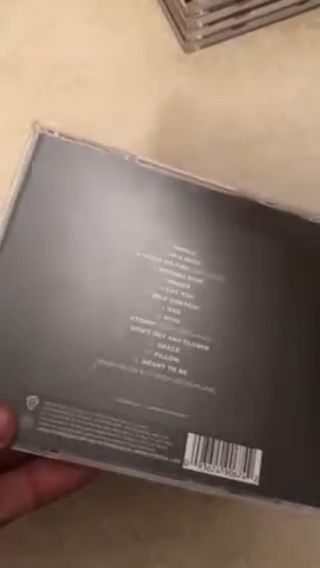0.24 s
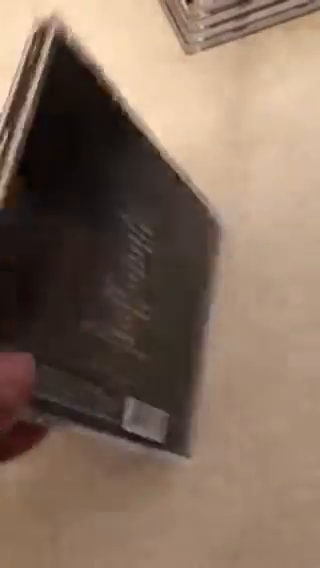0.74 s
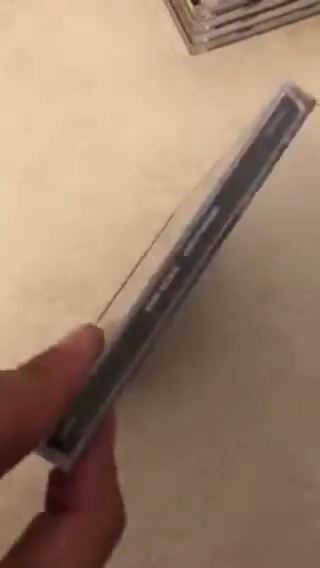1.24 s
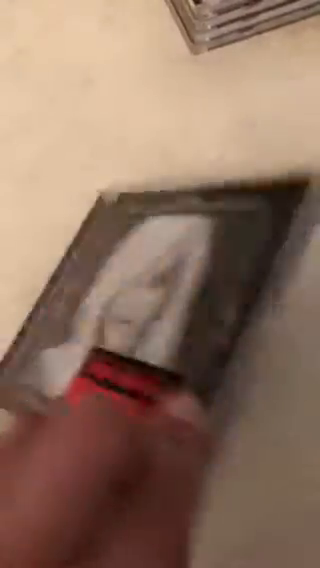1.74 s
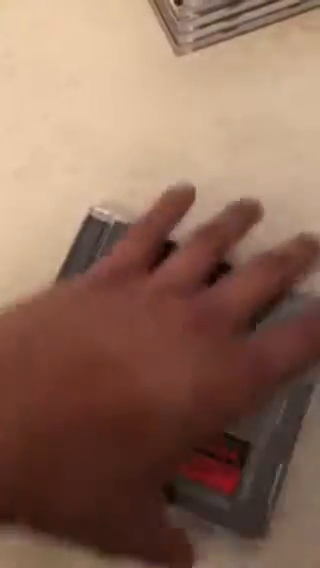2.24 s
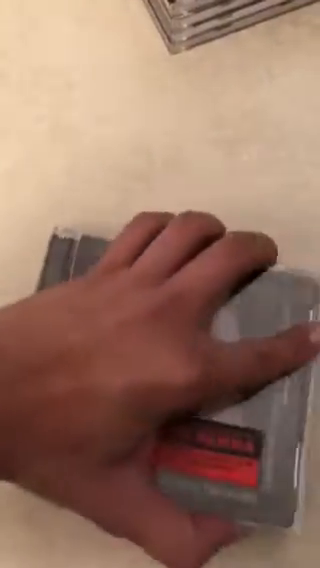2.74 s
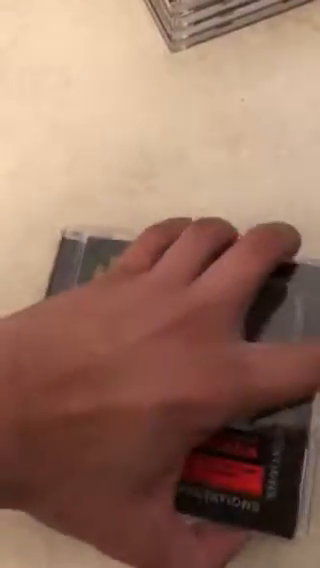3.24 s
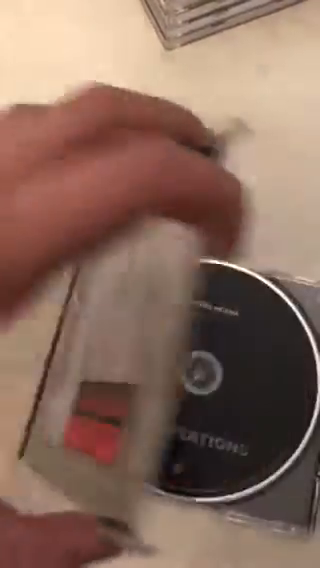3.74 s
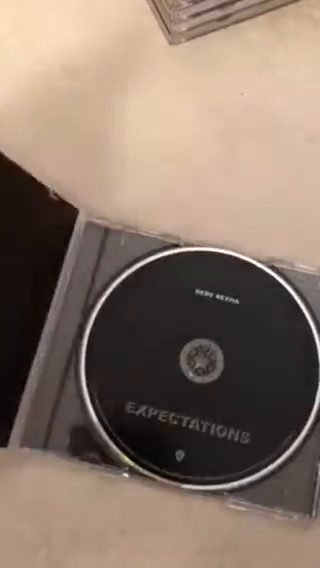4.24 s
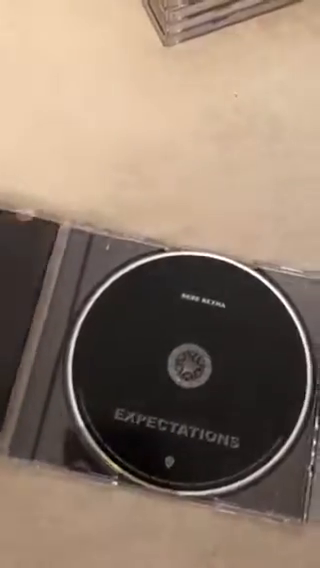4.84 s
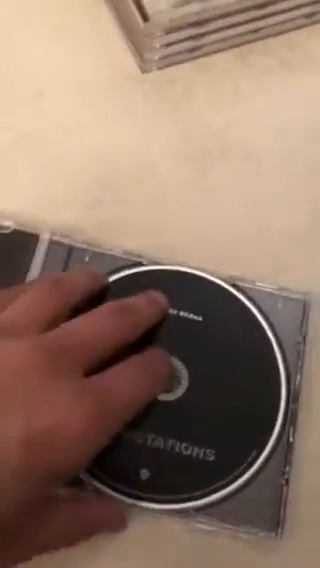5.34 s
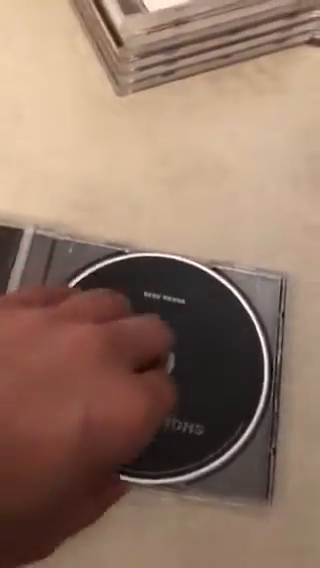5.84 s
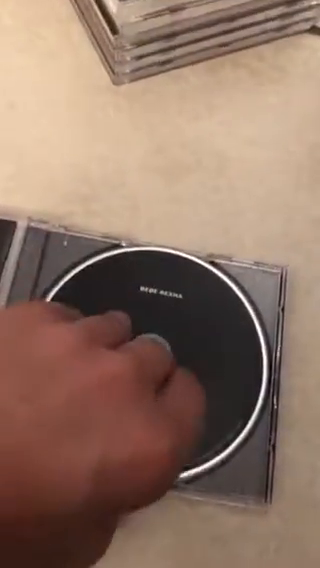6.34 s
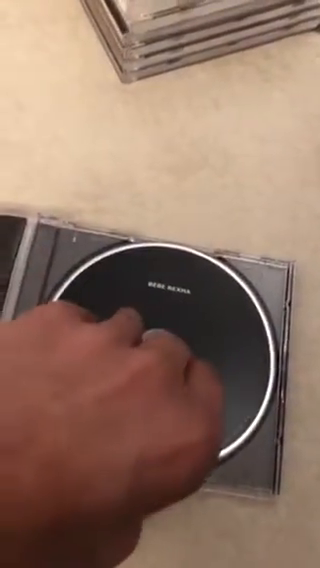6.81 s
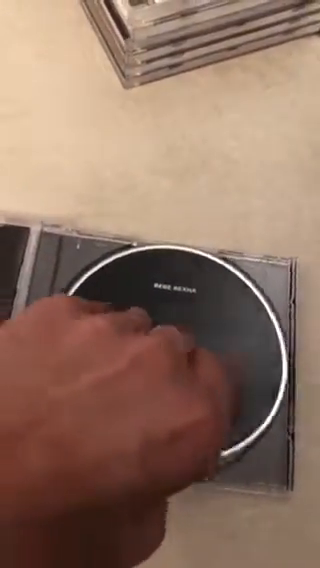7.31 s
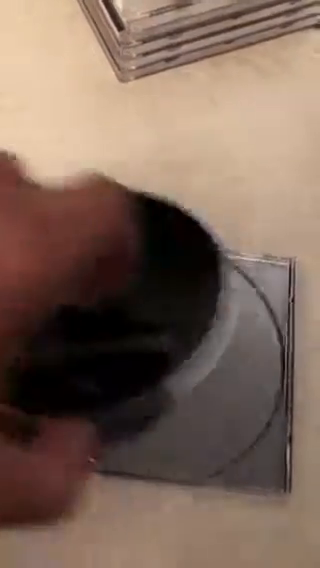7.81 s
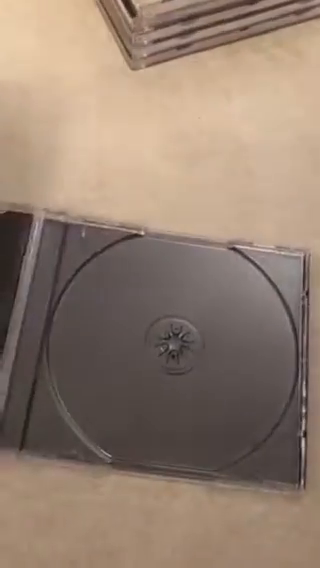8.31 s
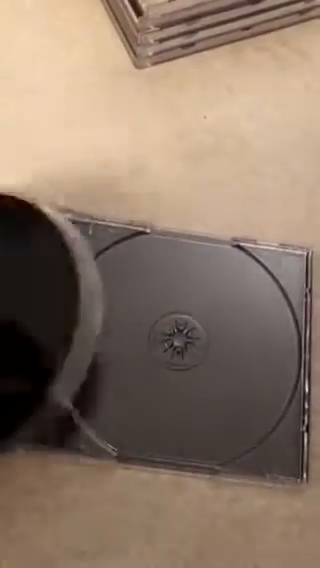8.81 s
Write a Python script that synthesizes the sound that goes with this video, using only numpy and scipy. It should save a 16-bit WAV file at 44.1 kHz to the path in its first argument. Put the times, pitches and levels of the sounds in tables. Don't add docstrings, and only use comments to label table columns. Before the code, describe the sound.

Close phone pickup of hands and a hollow plastic case on a counter: quiet ticks first, then taps and a loud rattling clack, a brief low creak, more hard clicks and skin rubbing as it opens, and a crisp double tick. Gentle sliding follows, then two very sharp snaps and a short rattle as the disc releases. Short room reflections, constant distant hum, faint traffic swell midway.

```python
import sys
import numpy as np
from scipy import signal
from scipy.fft import rfft, irfft
from scipy.io import wavfile
from scipy.ndimage import uniform_filter1d

SR = 44100
rng = np.random.default_rng(int(sys.argv[2]) if len(sys.argv) > 2 else 0)


def volts(x):
    e = np.asarray(x, float) / 20
    return 10 ** e


def to_wav(sig):
    pcm = np.clip(np.atleast_2d(sig), -1, 1) * 32767
    pcm = np.round(pcm).astype(np.int16)
    wavfile.write(sys.argv[1], SR, pcm.T)


N = 399987

# loudest_s, rising_s, fading_s, level_db, upper_band_minus_level_db
TRAFFIC = [
    (4.4, 1.4, 0.97, -62, -5),
]
# pitch_hz, density_db (per Hz)
AIR_SPECTRUM = [(24, -58), (45, -33.5), (62, -25.5), (95, -28), (200, -23.5), (310, -28.5), (400, -20.5),
                (600, -21), (720, -31), (2300, -34.5), (3000, -41), (5000, -50.5), (9000, -59),
                (13000, -67), (16000, -63)]
# pitch_hz, width_hz, lift_db
ROOM_BOOMS = [(110.3, 29.7, 14.5), (160.7, 21, 12), (242, 78, 11), (912, 200, 5.5), (1670, 92, 4),
              (2121, 304, 0.5)]
# time_s, turning_hz
SHAFT = [(0, 59.06), (1.5, 58.68), (3.5, 58.2), (5.5, 58.54), (7.5, 58.6), (9.07, 59.6)]
# multiple, level_db (rms)
SHAFT_ORDERS = [(1, -65.5), (2, -52.5), (3, -69.5), (4, -54), (5, -102), (6, -61)]
# pitch_hz, level_db (rms), wander_hz
TONES = [(41.5, -78, 0.18), (120.1, -60.5, 0.032), (210.9, -60, .8), (359.2, -55.5, 0.038),
         (383.6, -74, .4), (395.4, -61, 0.92)]
# centre_hz, t60_s
ROOM_T60 = [(1200, .22), (3500, 0.19), (10000, 0.17)]
# fastest_s, speeding_up_s, slowing_down_s, level_db, sheen_minus_level_db
RUBS = [(1.742, 0.045, 0.077, -59, -18), (2.1, 0.11, 0.07, -60, -16), (2.482, 0.042, 0.058, -57.5, -11),
        (2.99, .06, 0.082, -63, -16), (3.15, .08, 0.098, -57.5, -14), (3.508, .1, 0.13, -66, -19),
        (4.38, .04, .08, -80, 2), (4.54, .03, 0.063, -72, -12), (4.81, .12, .08, -74.5, 4),
        (4.92, .06, 0.044, -76, 2), (5.44, 0.061, 0.16, -58.5, -15), (5.61, 0.091, .06, -61.5, -19),
        (5.71, .04, .06, -69, -3), (5.9, 0.11, .06, -73, -9), (6.085, 0.041, 0.02, -62, -5.5),
        (6.308, 0.022, .025, -71, -4.5)]
# fastest_s, speeding_up_s, slowing_down_s, squeak_db, groan_minus_squeak_db
CREAKS = [
    (2.49, 0.028, 0.021, -62, 14),
    (3.53, 0.097, .12, -72, -7.5),
    (3.677, .02, .03, -71, 0),
]
# pitch_hz, width_hz, level_db
SQUEAK = [(4300, 260, -3.5), (5040, 200, 2), (6250, 286, -2.5), (7350, 400, -5.5)]
# pitch_hz, level_db, t60_s
SHELL = [(417.4, -13, 0.011), (588, -18.5, 0.018), (796, -11, 0.0135), (1128, -4, 0.033),
         (1220, 3.5, 0.016), (1425, 13, 0.0073), (1720, 4.5, 0.018), (1880, -0.5, 0.016)]
# pitch_hz, level_db, t60_s
WALLS = [(2086, -3, 0.011), (2560, 1, 0.0088), (3110, 2, .008), (3483, 0, 0.01), (3733, 4, 0.006485),
         (4300, 3.5, 0.0055), (4820, 4.5, 0.0052), (5300, 5, 0.0035), (5723, -1, 0.0086), (6670, 2, 0.0031)]
# pitch_hz, level_db, t60_s
EDGES = [(7570, 5, 0.001336), (8910, -7.5, 0.001543), (9340, -2.5, 0.00169), (11610, -3.5, 0.00242),
         (12950, -2, 0.0018), (14330, -5, 0.0019), (15500, -5, .002)]
# pitch_hz, level_db, t60_s
DISC = [(550, -6.5, .012), (798.1, -6, 0.013), (1118, -2, 0.019), (1380, -2.5, 0.01), (1596, 2, 0.022),
        (1890, -5, 0.011)]
# pitch_hz, level_db, t60_s
PETALS = [(1950, -4.5, 0.0096), (2450, -8.5, 0.0064), (2900, -1, .009), (3250, -1, .01), (3800, 1, .009),
          (4510, -4.5, 0.0055), (5400, 3, .009), (5960, 3.5, .007), (6700, -6.5, .004)]
# start_s, ring_db (walls, rms over 5 ms), boom_minus_ring_db, chatter_s
TAPS = [(1.706, -53, 6, 0.0075), (1.716, -56.5, 18.5, .0068), (1.729, -51.5, 13.5, 0.01),
        (1.744, -44.5, 8, 0.0079), (1.759, -52.5, 10.5, 0.006), (1.776, -59.5, 1, .006),
        (1.817, -60, 10, .0048), (1.845, -58, 12, .0046), (1.984, -62, 9, 0.0045),
        (2.064, -58, 13.5, 0.0076), (2.412, -60.5, 11.5, .0035), (2.47, -60, 3, .008),
        (2.8624, -62, 8, .006), (2.9485, -52.5, 5.5, 0.0062), (3.131, -56, 9, 0.016),
        (3.226, -52, 9, 0.012), (5.3767, -65, 11, .005), (5.3963, -62, 10, .0075), (5.439, -58, 10, 0.012),
        (5.5027, -62.5, 11.5, .0052), (5.5695, -67, 15.5, .012), (7.5224, -63.5, 10, .006)]
# start_s, ring_db, boom_minus_ring_db, loudest_hz, chatter_s
RATTLES = [
    (2.1404, -19, -5, 2900, .0146),
    (2.81, -44.5, 7.5, 1466, .007),
    (7.266, -38.5, -6.5, 3630, .0035),
    (7.2706, -30.5, -14.5, 3100, 0.011),
    (7.281, -36, -12, 4300, .016),
    (7.297, -43.5, -7.5, 5300, .018),
]
# start_s, ring_db, crack_minus_ring_db, loudest_hz, chatter_s
KNOCKS = [(0.7098, -42.5, -18, 1460, .0082), (1.03, -45, -11, 1425, .0102),
          (1.9265, -44, -18, 4250, 0.0038), (2.129, -25.5, -15, 1440, 0.0071),
          (2.159, -36, -7, 1560, 0.0097), (2.8219, -21.5, -12.5, 1285, 0.0039),
          (2.8338, -35, -13, 1460, .0051), (2.8482, -37.5, -17, 1320, 0.0042),
          (2.879, -40.5, -15, 1460, .0048), (3.155, -40.5, -12.5, 4100, 0.0063),
          (3.2361, -39, -8, 1300, .0083), (3.2431, -31, -13, 3500, 0.0047),
          (4.97, -36.5, -0.5, 2470, 0.0036), (4.9735, -34, -4.5, 1830, 0.0066)]
# start_s, ring_db, crack_minus_ring_db, loudest_hz, chatter_s
TEETH = [(1.9424, -57.5, -20, 3270, 0.0054), (1.628, -64, -16, 5350, .004), (3.254, -45, -19, 3280, .0089),
         (3.672, -61.5, -22, 4300, .0045), (5.686, -66, -3, 4300, .0091), (5.7244, -68, -7, 4300, .0084),
         (5.7934, -66, -.6, 4300, .0013), (6.7398, -47, -2.2, 4970, 0.0022),
         (6.853, -45.5, -2.5, 4900, 0.0024), (6.9894, -71, 0, 5300, .0051), (7.01, -64, -16, 3300, .0097),
         (7.0254, -71.5, -6.5, 5300, .001), (7.1061, -20.5, -14, 3250, .00244),
         (7.1234, -52, -11, 3790, .0076), (7.2318, -57.5, -9.5, 3532, .0062),
         (7.243, -65, -6.5, 5300, .004), (7.2536, -16, -6.5, 4700, 0.0022), (7.574, -68, 2, 7430, .0028)]

AIR_DB = -49
GAP_S, BUILD_S = .011, .007
ROOM_DB, NEAR_DB = -18, -12.5
STROKE_FALL_DB = 14.5
GROAN_HZ = 1065
RADIATES_HZ = 303.26
KNOCK_EVEN_DB, KNOCK_BOOM_PER_DB = -35.5, -0.3346
TAP_CRACK_DB, TAP_DULL_PER_DB, TAP_HZ = -12.5, 0.35, 1440
RATTLE_CRACK_DB, HUB_BOOM_DB = -8.5, -12.5


def unit(x):
    return x / np.sqrt(np.mean(x ** 2))


def band(x, lo_hz, hi_hz, order=2):
    sos = signal.butter(order, [lo_hz, min(hi_hz, .45 * SR)], "band", fs=SR, output="sos")
    return signal.sosfilt(sos, x)


def noise_band(lo_hz, hi_hz, order=2):
    return band(rng.standard_normal(N), lo_hz, hi_hz, order)


def walk(rate_hz):
    hold = int(SR / rate_hz)
    steps = np.repeat(rng.standard_normal(N // hold + 1), hold)
    return 1.3 * uniform_filter1d(uniform_filter1d(steps, hold), hold)[:N]


def played(strokes, first, second):
    out, t = 0, np.arange(N) / SR
    for fastest, rise, fall, db, rel_db in strokes:
        away = np.where(t < fastest, (fastest - t) / rise, (t - fastest) / fall)
        speed = volts(db - STROKE_FALL_DB * np.minimum(away, 5) ** 2)
        out = out + speed * (first + volts(rel_db) * second)
    return out


def traffic():
    return played(TRAFFIC, unit(noise_band(380, 750)), unit(noise_band(750, 1500)))


def air():
    hz = np.arange(N // 2 + 1) * SR / N + 1
    point_hz, point_db = np.transpose(AIR_SPECTRUM)
    db = np.interp(np.log(hz), np.log(point_hz), point_db)
    for centre, width, lift in ROOM_BOOMS:
        db = db + lift / (1 + (2 * (hz - centre) / width) ** 2)
    wash = irfft(rfft(rng.standard_normal(N)) * volts(db), N)
    return volts(AIR_DB + .5 * walk(0.676)) * unit(wash)


def machines():
    time_s, turning_hz = np.transpose(SHAFT)
    turn = 2 * np.pi * np.cumsum(np.interp(np.arange(N) / SR, time_s, turning_hz)) / SR
    hum = np.zeros(N)
    for multiple, db in SHAFT_ORDERS:
        hum += volts(db + 1.0 * walk(5.2)) * np.sin(multiple * turn + 2 * np.pi * rng.random())
    for hz, db, wander in TONES:
        phase = 2 * np.pi * np.cumsum(hz + wander * walk(2)) / SR
        hum += volts(db + 1.3 * walk(2.995)) * np.sin(phase)
    return np.sqrt(2) * hum


def room(x):
    t = np.arange(SR // 2) / SR
    rise = np.clip((t - GAP_S) / BUILD_S, 0, 1) * 0.81 + 0.46 * (t > GAP_S) + volts(NEAR_DB) * (t > .002)
    tail = np.zeros(len(t))
    for hz, t60 in ROOM_T60:
        hiss = unit(band(rng.standard_normal(len(t)), hz / 1.3, hz * 2.0))
        tail += hiss * np.sqrt(hz) * 1000 ** (-t / t60)
    tail = tail * rise
    return volts(ROOM_DB) * signal.fftconvolve(x, tail / np.sqrt(np.sum(tail ** 2)))[:N]


def rubbing():
    size_db = 2.3 * rng.exponential(size=N) + 4.3 * walk(60)
    slips = rng.standard_normal((2, N)) * volts(size_db)
    return played(RUBS, unit(band(slips[0], 1300, 4440)), unit(band(slips[1], 5200, 19300)))


def creaking():
    squeak = np.zeros(N)
    for hz, width, db in SQUEAK:
        squeak += volts(db + 3.2 * walk(50)) * unit(noise_band(hz - width / 2, hz + width / 2, order=1))
    groan = volts(1.45 * walk(60)) * noise_band(GROAN_HZ - 120, GROAN_HZ + 120)
    return played(CREAKS, unit(squeak), unit(groan))


def even(push):
    spectrum = rfft(push, 4096)
    coarse = np.sqrt(uniform_filter1d(np.abs(spectrum) ** 2, size=14))
    return irfft(spectrum / coarse)[:len(push)]


def ring(modes, favoured_hz, tilt_db, chance):
    hz, db, t60 = np.transpose(modes)[:, :, None]
    gain, shift = chance[:, :len(modes), None]
    db = db + 8 * np.exp(-(np.log(hz / favoured_hz) / 0.1) ** 2)
    db = db + tilt_db * np.log2(hz / hz[0]) + .8 * gain
    sign = (-1.) ** np.arange(len(modes))[:, None]
    t = np.arange(2048) / SR
    swing = np.sin(2 * np.pi * hz * (1 + .01 * shift) * t)
    return np.sum(sign * volts(db) * swing * 1000 ** (-t / t60), axis=0)


def contacts(chatter_s, persist, rise_s, strike):
    t = np.arange(1024) / SR
    grit, size = rng.standard_normal((2, 1024))
    fade = np.exp(-1.4 * (t / max(chatter_s, 1e-4)) ** persist) * np.minimum(t / rise_s, 1)
    push = even(even(grit * volts(2.2 * size) * fade) * np.sqrt(fade))
    push[int(rise_s * SR)] += strike * np.sqrt(np.sum(push ** 2))
    return push


def clicks(events, walls, body, strike, damping, persist, rise_s, dulling, edge_tilt_db):
    out = np.zeros((2, N + 4096))
    for start_s, ring_db, body_db, crack_db, hz, chatter_s in events:
        push = contacts(chatter_s, persist, rise_s, strike)
        start = int(start_s * SR)
        soft_db = dulling * (crack_db - body_db + 5)
        parts = [(walls, 1900, 7200, 0, soft_db),
                 (body, RADIATES_HZ, 2100, body_db, 0),
                 (EDGES, 6800, 17000, crack_db, edge_tilt_db)]
        for modes, lo_hz, hi_hz, rel_db, tilt_db in parts:
            damped = [(f, d, t60 * damping) for f, d, t60 in modes]
            near = ring(damped, hz, tilt_db, rng.standard_normal((2, 10)))
            blurred = np.sqrt(uniform_filter1d(np.abs(rfft(near, 4096)) ** 2, size=160))
            to_phone = signal.fftconvolve(push, near)
            to_room = irfft(rfft(push, 4096) * blurred)[:2048]
            for row, y in zip(out, (to_phone, to_room)):
                y = band(y, lo_hz, hi_hz)
                rms = np.sqrt(np.sum(y ** 2) / (SR / 200))
                row[start:start + len(y)] += volts(ring_db + rel_db) * y / rms
    return out[:, :N]


def taps():
    events = [(s, db, boom, TAP_CRACK_DB + TAP_DULL_PER_DB * (db + 51), TAP_HZ, c) for s, db, boom, c in TAPS]
    return clicks(events, WALLS, SHELL, strike=.1, damping=1.4, persist=0.89, rise_s=.0008,
                  dulling=0.33, edge_tilt_db=-14.0)


def rattles():
    events = [(s, db, boom, RATTLE_CRACK_DB, hz, c) for s, db, boom, hz, c in RATTLES]
    return clicks(events, WALLS, SHELL, strike=.05, damping=0.655, persist=3.0, rise_s=0.0012,
                  dulling=0.23, edge_tilt_db=-1.5)


def hub_teeth():
    events = [(s, db, HUB_BOOM_DB, crack, hz, c) for s, db, crack, hz, c in TEETH]
    return clicks(events, PETALS, DISC, strike=1.2, damping=0.83, persist=0.72, rise_s=0.00021,
                  dulling=0.0997, edge_tilt_db=.3)


def knocks():
    events = [(s, db, KNOCK_BOOM_PER_DB * (db - KNOCK_EVEN_DB), crack, hz, c) for s, db, crack, hz, c in KNOCKS]
    return clicks(events, WALLS, SHELL, strike=0.47, damping=1.22, persist=0.89, rise_s=0.000357,
                  dulling=0.32, edge_tilt_db=-9.0)


def scene():
    background = traffic() + air() + machines()
    hands = rubbing() + creaking()
    direct, spread = hands + taps() + rattles() + hub_teeth() + knocks()
    return (background + room(spread) + direct)[None]


def top_cut(x):
    return signal.sosfilt(signal.butter(12, 17130, fs=SR, output="sos"), x)


def record(dry):
    steep = signal.ellip(7, .5, 75, 15850, fs=SR, output="sos")
    return top_cut(signal.sosfilt(steep, dry))


dry = scene()
out = record(dry)
to_wav(out)
```